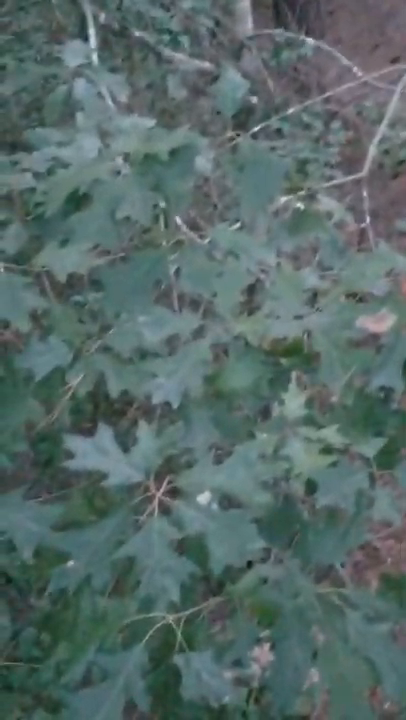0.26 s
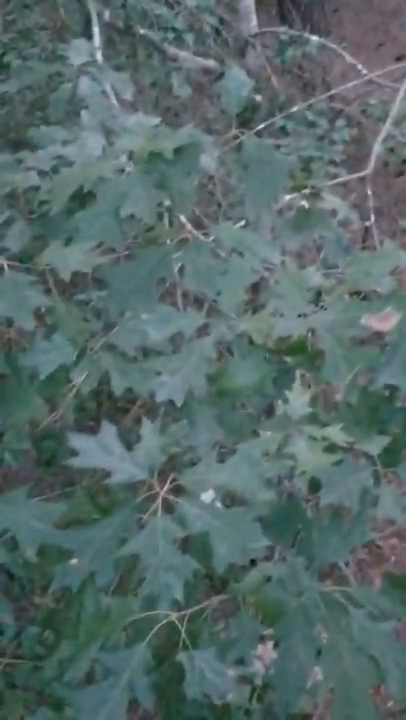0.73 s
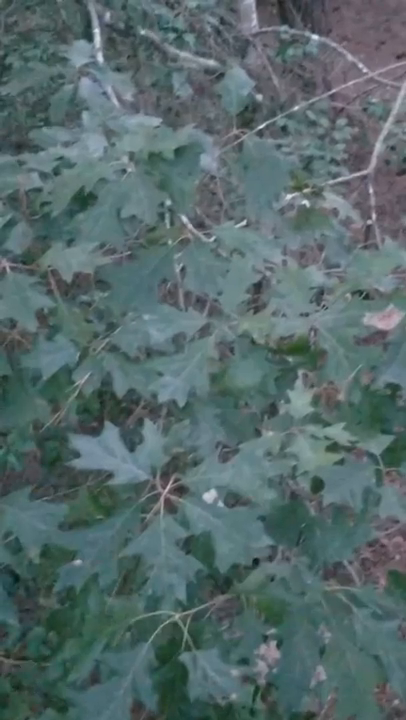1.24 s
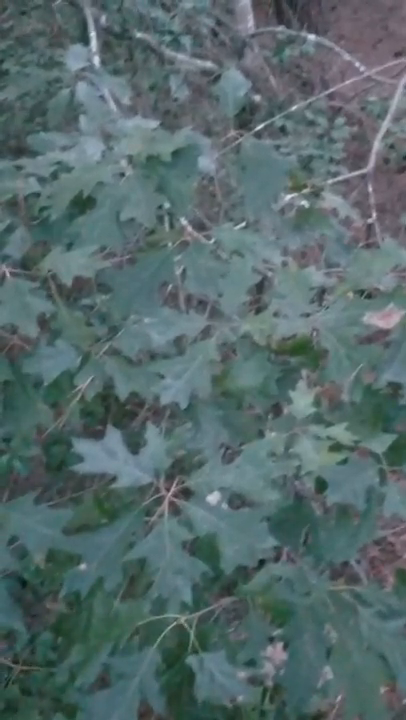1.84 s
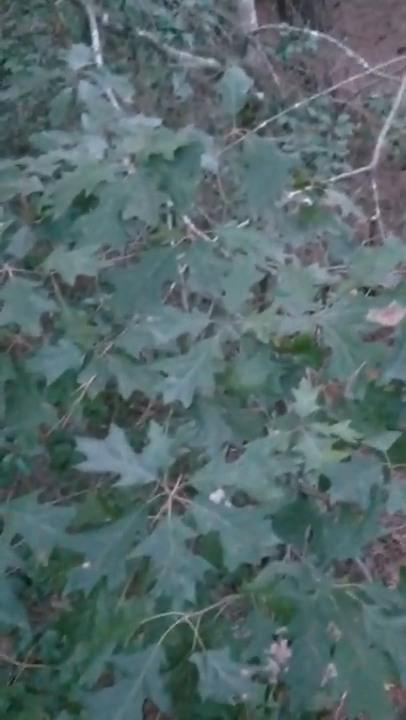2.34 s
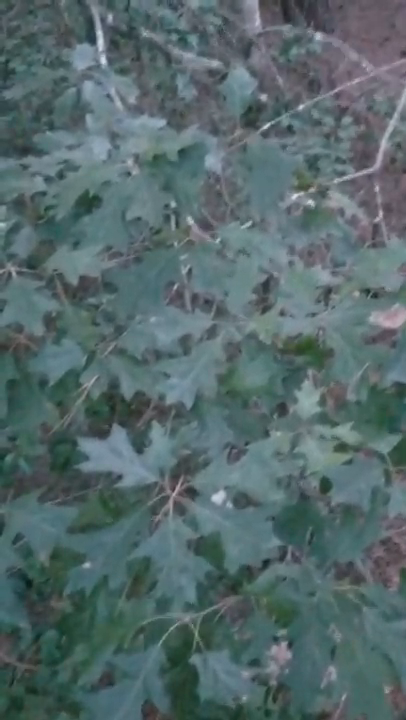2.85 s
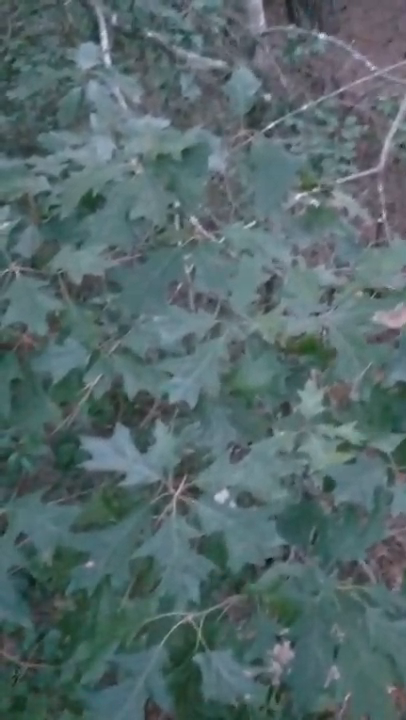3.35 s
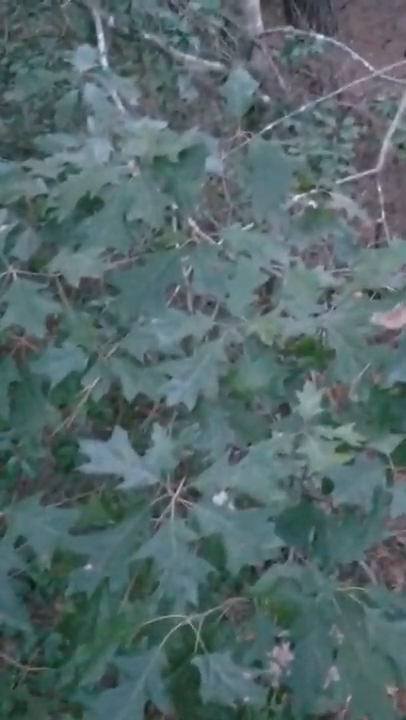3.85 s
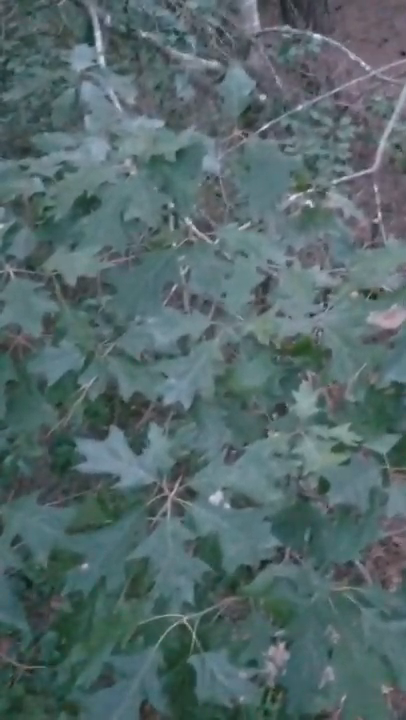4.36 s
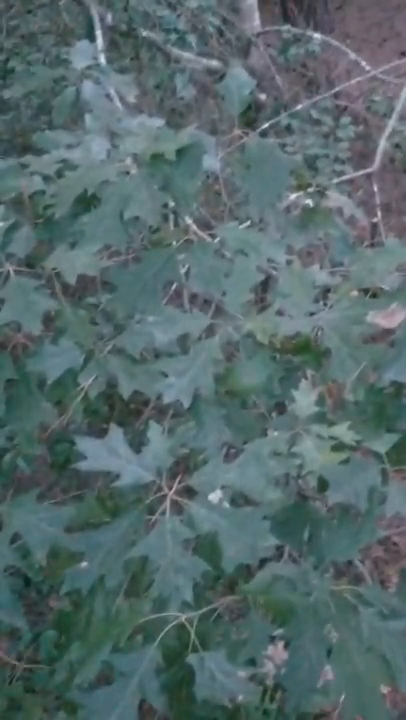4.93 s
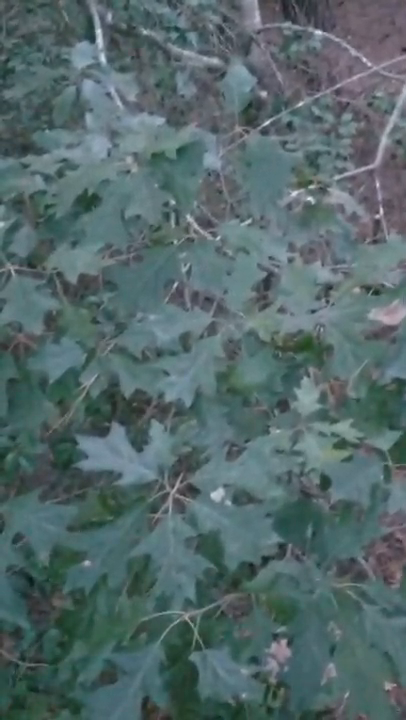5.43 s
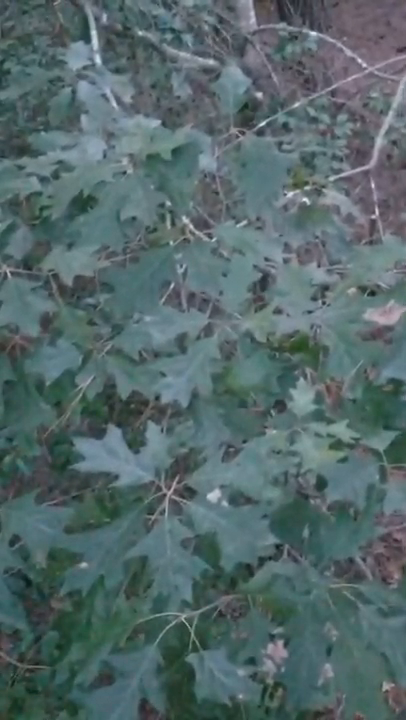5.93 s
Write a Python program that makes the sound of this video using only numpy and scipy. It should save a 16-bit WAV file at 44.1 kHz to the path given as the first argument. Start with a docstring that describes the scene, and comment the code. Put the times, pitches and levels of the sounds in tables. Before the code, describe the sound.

A calm wood, heard in stereo close to the shooter. From 0 to 4.9 seconds, three crickets chirp in overlapping short pulses around 4.5 to 5 kHz, over a finely beating insect trill near 8 kHz, hissing distant insects and soft leafy air. A low engine hum, far off, is louder at first and recedes. A small bird gives abrupt rising chips at 0.3, 2.6, 3.2 and 4.3, the second and fourth clearest. Small dry clicks come at 2.3 and 3.6, with faint hand rumble; a thin whistle rises at 4.5. At 4.9 a crossbow fires: bright latch snap, then within ten milliseconds a huge, short, woody slam with crack and faint trunk echoes. At 5.14 the bolt knocks sharply, rebounding at once. Until about 6.2 the ambience is ducked and faint, with brief sleeve scuffs and clicks at 5.3, 5.6, 5.8 and 6.05.

```python
"""In a wood, crickets chirp, a meadow insect trills, a small bird chips and a far engine hums; a crossbow is fired.
The latch snap, the string slam and the bolt's knock a quarter second later are noise bursts and struck resonances.
Animal and engine notes are sines of varying pitch; the insect chorus, trill rasp, air, cloth and hand are shaped noise.
Ticks are brief band-passed bursts, and trunks and leaves add scatter and echoes.
The shot drives the recorder's gain down, so the wood and the rustle of handling are faint afterwards."""
import sys
import numpy as np
from scipy import signal
from scipy.fft import rfft, irfft
from scipy.io import wavfile
from scipy.ndimage import uniform_filter1d

SR = 44100
rng = np.random.default_rng(int(sys.argv[2]) if len(sys.argv) > 2 else 0)


def generate_wav(sig):
    """Save sig (samples, or channels by samples) to the path in sys.argv[1] as 16-bit PCM at SR."""
    pcm = np.round(np.clip(np.atleast_2d(sig).T, -1, 1) * 32767).astype(np.int16)
    wavfile.write(sys.argv[1], SR, pcm)


N = 272964
TIME = np.arange(N) / SR   # seconds
BINS_HZ = np.maximum(np.arange(N // 2 + 1) * SR / N, 1)

# All noise spectra are relative, and every balance is left over right.
# Blows inside the bow. Each row: start in seconds, relative level in dB, rise in seconds,
# 60 dB decay time in seconds, share of bright crack from 0 to 1.
BLOWS = [(4.8988, -2, .001, 0.036, 0.88), (4.901, -1.5, .0008, 0.028, 1), (4.905, -2.5, .003, 0.053, .3),
         (4.9091, 10.5, .002, .07, .15), (4.9106, 9.5, .001, 0.082, .4), (4.9552, -0.5, .0005, .01, 1),
         (4.965, -19.5, 0.0036, 0.14, 0.7)]
# Spectrum of latch and string. Each row: frequency in Hz, density in dB per Hz.
CRACK_SPECTRUM = [(180, -50.5), (300, -20), (737, -29), (1060, -0.5), (1840, -5.5), (2570, 1.5),
                  (3400, -19), (3830, -6.5), (7570, -11.5), (9550, -20.5), (10200, -15), (13100, -11),
                  (16000, -15)]
# Spectrum of limbs and stock. Each row: frequency in Hz, density in dB per Hz.
SLAM_SPECTRUM = [(24, -33), (40, -8), (99, -1.5), (171, -5.5), (615, -5), (1150, -1), (1440, -14),
                 (1810, 0), (2260, -9.5), (2840, 1.5), (3140, -11.5), (5050, -8), (8340, -32), (14100, -17),
                 (16000, -15)]
# Resonances of limbs, stock and string. Each row: frequency in Hz, relative level in dB, 60 dB decay time in seconds.
BOW_MODES = [(66, -28, 0.15), (96, -35, 0.52), (279, -16.5, 0.12), (313, -17, 0.098), (548, -12.5, 0.059),
             (639, -6, .06), (877, -6, 0.079), (1081, -12.5, 0.12), (1222, -11.5, .1), (1478, -23.5, .22),
             (1620, -19, 0.12), (1786, -15.5, .11), (1880, -19.5, 0.17), (2280, -14.5, 0.071),
             (2516, -15, 0.089), (2590, -8.5, 0.065), (2730, -15, 0.057), (4400, -16.5, 0.098),
             (4980, -14.5, .1), (5500, -20.5, 0.086)]
# Stereo balance of the bow. Each row: frequency in Hz, balance in dB.
BOW_PAN = [(60, 2.5), (400, 2), (1300, 2), (2400, -5), (4400, -0.5), (8000, 5.5), (11000, 6.5),
           (14000, 12.5)]
# Echoes of the shot from near trunks. Each row: delay in seconds, level in dB.
TRUNK_ECHOES = [(.041, -29), (.052, -25.5), (.066, -36)]
# The bolt strikes and rebounds. Each row: time in seconds, relative level in dB.
BOLT_HITS = [(5.1420, -14), (5.1438, -18), (5.1452, -6.5), (5.1503, -5)]
# Resonances of the bolt's knock. Each row: frequency in Hz, relative level in dB, 60 dB decay time in seconds.
BOLT_MODES = [(338, -25.5, 0.051), (740, -25, 0.0072), (1290, -22.5, 0.0078), (2130, -8.5, 0.0081),
              (2370, -8, .012), (2690, -38, 0.0087), (4760, -16, 0.0089)]
# Clear clicks of gear and twigs. Each row: start in seconds, level in dB, centre in Hz,
# ratio of band edge to centre (1.2 at least is used), 60 dB decay time in seconds, balance in dB.
TICKS = [(1.758, -49, 6000, 2, 0.0058, -5), (2.292, -42.5, 12000, 3.2, .0066, -7),
         (2.335, -33.5, 6000, 2.8, 0.0019, -9), (3.252, -48, 8000, 2.2, 0.016, -9),
         (3.441, -48, 1850, 1.13, .019, -6), (3.6431, -30, 4500, 2.4, 0.0014, -20),
         (5.3191, -26, 3200, 2.8, .014, 3), (5.591, -32.5, 5950, 1.57, 0.0046, -17),
         (5.799, -17, 2620, 2, 0.0037, 17), (5.8037, -19.5, 1960, 3, .0041, -5),
         (6.029, -37, 790, 1.9, .027, -9), (6.075, -30, 2010, 1.9, 0.013, 2)]
# Strokes of the sleeve over the stock. Each row: peak time in seconds, length in seconds, level in dB.
SLEEVE_STROKES = [(5.083, 0.027, -31), (5.105, 0.023, -34), (5.345, 0.13, -42.5), (5.514, 0.046, -37),
                  (5.78, .13, -46.5), (5.996, .042, -33), (6.059, .058, -40), (6.124, 0.052, -39.5),
                  (6.178, 0.038, -38.5)]
# Spectrum of cloth. Each row: frequency in Hz, density in dB per Hz.
CLOTH_SPECTRUM = [(25, -21), (60, -1), (130, -7), (300, -11.5), (600, -9), (1000, -15.5), (2500, -14),
                  (3600, -26.5), (5300, -16.5), (7700, -40.5), (12500, -27), (16000, -31)]
# Stereo balance of cloth. Each row: frequency in Hz, balance in dB.
CLOTH_PAN = [(100, -7.5), (1000, -11), (3000, -23), (12000, -5)]
# The hand shifts its grip on the recorder. Each row: peak time in seconds, level in dB.
NUDGES = [(2.5, -62.5), (3.03, -62), (3.33, -58.5), (3.67, -55), (4.04, -57.5)]
# Spectrum of the hand's rumble. Each row: frequency in Hz, density in dB per Hz.
HAND_SPECTRUM = [(20, -15), (45, -1.5), (65, 3), (100, -11.5), (160, -23.5), (400, -59)]
# Stereo balance of the hand's rumble. Each row: frequency in Hz, balance in dB.
HAND_PAN = [(30, 2), (200, 2.4)]
# Cricket voices by name. Each row: pitch in Hz, sag in a stroke in Hz, stroke period in seconds,
# stroke length in seconds, strokes a chirp (rounded to a whole number), balance in dB.
CRICKETS = {"high": (4999.5, 379.5, .046, .032, 3, -6.5), "middle": (4799.5, 120, .046, .026, 4, -10),
            "low": (4600, 400, .038, .042, 3.5, -5)}
# Each cricket's chirps by name. Each row: start in seconds, level in dB.
CHIRPS = {"high": [(.055, -52), (.92, -52), (1.925, -54), (2.59, -51.5), (3.855, -53), (4.72, -57)],
          "middle": [(.255, -55), (.645, -53.5), (1.015, -53), (1.36, -60), (1.53, -53.5), (1.93, -50.5),
          (2.367, -52.5), (2.835, -54), (3.35, -53), (3.87, -55.5), (4.31, -54.5), (4.73, -51.5)],
          "low": [(.162, -56.5), (.6, -57.5), (1.168, -58), (1.61, -55), (2.035, -57.5), (2.385, -58.5),
          (2.757, -56.5), (3.3, -57), (3.71, -57), (4.135, -56.5), (4.688, -56.5)]}
# Chips of the bird. Each row: start in seconds, start pitch in Hz, end pitch in Hz, level in dB.
CHIPS = [(0.257, 5500, 7860, -39.5), (2.615, 5900, 7800, -31.5), (3.217, 5200, 7700, -44.5),
         (4.327, 5800, 8300, -29.5)]
# Spectrum of the trill's rasp. Each row: frequency in Hz, density in dB per Hz.
TRILL_SPECTRUM = [(5500, -48.5), (6900, -21.5), (7500, -2), (7820, -0.5), (7900, 1), (7980, -1.5),
                  (8150, -5), (8350, -49.5), (13500, -39.5), (14800, -19.5), (15700, -14), (16300, -25.5)]
# Stereo balance of the rasp. Each row: frequency in Hz, balance in dB.
TRILL_PAN = [(7000, 21), (16000, 9)]
# Slow course of the trill. Each row: time in seconds, relative level in dB.
TRILL_LEVEL = [(0, 0.64), (2.4, 1), (3.1, -1.4), (4.9, -1.5)]
# Spectrum of far rumble and leaves. Each row: frequency in Hz, density in dB per Hz.
AIR_SPECTRUM = [(15, -40.5), (25, -17), (55, -9.5), (152, -7.5), (188, -7.5), (218, -13), (379, -8),
                (592, -7.5), (732, -2.5), (1030, -9), (1670, -8), (2250, -19.5), (2790, -11.5),
                (3450, -32.5), (4000, -30), (5200, -49), (8800, -120)]
# Stereo balance of the wood. Each row: frequency in Hz, balance in dB.
WOOD_PAN = [(60, -6), (92, 1), (140, -4.5), (210, 1.0), (330, 0), (500, -4), (770, -3.0), (1170, -5),
            (1790, 5), (2740, -12.5), (4190, 5.5), (6410, 6.5), (9810, 6.0), (15000, 4.0)]
# Course of the far engine's roar. Each row: time in seconds, relative level in dB.
ROAR_LEVEL = [(0.1, -63), (1.35, -70), (1.68, -61), (1.87, -69), (4.63, -67), (4.7, -68)]
# Spectrum of the roar. Each row: frequency in Hz, density in dB per Hz.
ROAR_SPECTRUM = [(120, -30.5), (200, -6.5), (290, 2.5), (420, -1), (700, -37.0)]
# Stereo balance of the roar. Each row: frequency in Hz, balance in dB.
ROAR_PAN = [(200, 0.82), (400, 2)]
# Spectrum of the far insects. Each row: frequency in Hz, density in dB per Hz.
CHORUS_SPECTRUM = [(3500, -32), (4050, -18.5), (4300, -3.5), (4750, 6), (5200, 0), (6000, 3.5),
                   (6700, -10.5), (8000, 9), (8600, -30.5), (9700, -33.5), (10500, -12), (12600, -10),
                   (14000, -7), (16000, -3)]
# Stereo balance of the far insects. Each row: frequency in Hz, balance in dB.
CHORUS_PAN = [(4000, -2), (5400, -9), (6600, 2.5), (8000, -8), (9000, -9), (12600, -4), (14000, 5.5)]
# Coherence of the two ports. Each row: frequency in Hz, likeness from 0 to 1.
LIKENESS = [(60, 0.71), (200, 0.97), (500, 1), (1200, .25), (3000, 0.41), (8000, 0.1), (15000, .2)]

PORT_LAG_S, CUTOFF_HZ = .00032, 15900
# fainter ticks come at random
FAINT_TICKS_PER_S, FAINT_TICK_DB, FAINT_TICK_HZ, FAINT_TICK_T60_S, FAINT_TICK_PAN_DB = .7, -61, 9000, .009, -4
# part of a stroke spent swelling; its two ends lie this far under the peak
STROKE_SWELL_SHARE, STROKE_EDGE_DB = 0.57, 11
NUDGE_S, GRIP_DB, GRIP_WANDER_DB = 0.25, -68, 0.5   # length of a shift; rumble of the hand at rest
CHIP_FADE_DB = 5   # each chip fades as it climbs
# the far engine's note: settled level, how much louder it starts, time constant of receding
ENGINE_DB, ENGINE_EARLY_DB, ENGINE_RECEDE_S = -70, 8, 1.1


def crossbow(ring_db, crack_db, slam_db):
    """Impact excitation: each blow is a burst of dense noise, and the heaviest sets limbs and stock ringing."""
    crack_power, slam_power, strikes = 0, 0, []
    for s, db, rise, t60, bright in BLOWS:
        power = (from_db(db) * burst(s, rise, t60)) ** 2
        bright = np.clip(bright, 0, .99)
        crack_power = crack_power + bright * power
        slam_power = slam_power + (1 - bright) * power
        strikes.append((s + rise, db + 10 * np.log10(1 - bright)))
    out = from_db(crack_db) * np.sqrt(crack_power) * noise(CRACK_SPECTRUM, BOW_PAN)
    out += from_db(slam_db) * np.sqrt(slam_power) * noise(SLAM_SPECTRUM, BOW_PAN)
    heaviest_s, heaviest_db = max(strikes, key=lambda strike: strike[1])
    for hz, db, t60 in BOW_MODES:
        # the shock reaches each part of the bow at a slightly different moment
        arrival_s = heaviest_s + rng.uniform(-0.0033, 0.0011)
        force = clicks([(arrival_s, heaviest_db + db + ring_db)]) * rng.choice([-1, 1])
        out += ports(ring(force, hz, t60), at_hz(BOW_PAN, hz), lag_s=rng.uniform(0, PORT_LAG_S))
    echo_band = signal.butter(1, [900, 4000], "band", fs=SR, output="sos")
    reflected = signal.sosfilt(echo_band, out)
    echoes = sum(from_db(db) * np.array([late(side, delay) for side in reflected])
                 for delay, db in TRUNK_ECHOES)
    return out + echoes


def bolt(splinter_db, pan_db):
    """Modal response to impact: repeated hits excite damped woody modes, with a little splintering noise."""
    force = clicks(BOLT_HITS)
    knock = sum(from_db(db) * ring(force, hz, t60) for hz, db, t60 in BOLT_MODES)
    splinter_envelope = burst(BOLT_HITS[0][0], 0.00032, 0.35)
    splinter = from_db(splinter_db) * splinter_envelope * noise(CRACK_SPECTRUM, BOW_PAN)
    return ports(knock, pan_db) + splinter


def ticks(lag_s):
    """Transient in a heavily damped resonance: each click is a very short burst of band-passed noise."""
    out = np.zeros((2, N))
    faint = [(s, FAINT_TICK_DB, FAINT_TICK_HZ, 2, FAINT_TICK_T60_S, FAINT_TICK_PAN_DB)
             for s in TIME[rng.random(N) < FAINT_TICKS_PER_S / SR]]
    white = rng.standard_normal(N)
    for s, db, hz, width, t60, pan_db in TICKS + faint:
        width = max(width, 1.2)
        band = signal.butter(2, [hz / width, min(hz * width, .45 * SR)], "band", fs=SR, output="sos")
        grain = rms_one(signal.sosfilt(band, white))
        out += ports(from_db(db) * grain * burst(s, .0001, t60), pan_db, lag_s)
    return out


def sleeve(grain_db, drag_db):
    """Stick-slip friction: cloth catches and slips as the bow is lowered, and drags lightly between strokes."""
    strokes = sum(from_db(db) * swell(s, length, STROKE_SWELL_SHARE, STROKE_EDGE_DB)
                  for s, length, db in SLEEVE_STROKES)
    drag = from_db(drag_db) * (TIME > SLEEVE_STROKES[0][0])
    return np.hypot(strokes, drag) * flutter(220, grain_db) * noise(CLOTH_SPECTRUM, CLOTH_PAN)


def hand():
    """Contact noise: the grip on the recorder gives a low rumble, with a soft bump at each shift."""
    nudges = sum(from_db(db) * swell(s, NUDGE_S, rise_share=0.48, edge_db=15) for s, db in NUDGES)
    resting = from_db(GRIP_DB) * flutter(4.5, GRIP_WANDER_DB)
    return np.hypot(nudges, resting) * noise(HAND_SPECTRUM, HAND_PAN)


def cricket(chirps, top_hz, fall_hz, period, stroke_s, strokes, pan_db):
    """Stridulation: file draws over scraper, a note that sags as the wing slows, uneven from tooth to tooth."""
    out = np.zeros(N)
    along = np.linspace(0, 1, int(stroke_s * SR))
    teeth = flutter(700, 0.18)
    for s, db in chirps:
        for k in range(round(strokes)):
            at = int((s + k * period) * SR)
            span = slice(at, at + len(along))
            hz = (top_hz - fall_hz * along ** 2.6) * (1 + rng.normal(0, 0.004)) * teeth[span]
            out[span] += from_db(db) * np.sin(np.pi * along) * tone(hz)
    return ports(out, pan_db, lag_s=0.00027)


def bird(length_s, octave_db, pan_db):
    """Frequency modulation: a chip is one abrupt upward whistle with its octave, its pitch roughened at random."""
    out = np.zeros(N)
    along = np.linspace(0, 1, int(length_s * SR))
    abrupt = np.abs(np.sin(np.pi * along)) ** .4   # starts and stops almost at once
    envelope = abrupt * from_db(-CHIP_FADE_DB * along)
    climb = np.tanh(2 * along) / np.tanh(2)
    rasp = flutter(2200, .3)
    for s, start_hz, end_hz, db in CHIPS:
        span = slice(int(s * SR), int(s * SR) + len(along))
        hz = (start_hz + (end_hz - start_hz) * climb) * rasp[span]
        out[span] += from_db(db) * envelope * (tone(hz) + from_db(octave_db) * tone(2 * hz))
    return ports(out, pan_db, lag_s=.00004)


def far_whistle(start_s, length_s, start_hz, rise_hz, db, waver):
    """Frequency glide: a thin wavering note from deep in the wood rises and levels off."""
    along = np.clip((TIME - start_s) / length_s, 0, 1)
    hz = (start_hz + rise_hz * np.sin(np.pi / 2 * along)) * flutter(520, waver)
    envelope = from_db(db) * np.sqrt(along * (1 - along))   # peaks at half the gain
    return ports(envelope * tone(hz), -5.0, lag_s=.00018)


def trill(db, depth, closing_db, note_hz, note_db, snap_db):
    """Amplitude modulation: opening and closing wings beat a rasp and a note; each closing brightens it."""
    beats_per_s = 25.7
    phase = 2 * np.pi * np.cumsum(beats_per_s * flutter(1.5, .1)) / SR
    beat = (1 + depth * np.cos(2 * phase)) * from_db(closing_db * np.cos(phase))
    closing = from_db(snap_db * np.cos(phase / 2) ** 24)   # a narrow peak once a beat
    note = from_db(note_db) * flutter(25, 3) * tone(note_hz * flutter(90, .018))
    rasp = noise(TRILL_SPECTRUM, TRILL_PAN)
    overtone = irfft(rfft(rasp) * (BINS_HZ > 11000), N)
    body = rasp - overtone + ports(note, 14)
    wings = rms_one(beat) * body + rms_one(closing) * overtone
    return from_db(db) * level(TRILL_LEVEL) * wings


def engine(roar_db, hum_hz):
    """Tone and noise: a far engine's wavering note starts louder and recedes, with a rough roar just above it."""
    hum_level = from_db(ENGINE_DB + ENGINE_EARLY_DB * np.exp(-TIME / ENGINE_RECEDE_S))
    hum = hum_level * flutter(9.4, 2) * tone(hum_hz * flutter(9.2, 0.09))
    roar = from_db(roar_db) * level(ROAR_LEVEL) * noise(ROAR_SPECTRUM, ROAR_PAN)
    return ports(hum, 1.5) + roar


def insect_chorus(db):
    """Superposition: many far insects merge into banded noise of unsteady level."""
    return from_db(db) * flutter(7, .6) * noise(CHORUS_SPECTRUM, CHORUS_PAN)


def air(db):
    """Broadband ambience: far rumble and leaves are a nearly steady noise."""
    return from_db(db) * flutter(3, 0.3) * noise(AIR_SPECTRUM, WOOD_PAN)


def woods(x, wet_db, t60, dull_hz):
    """Diffuse scattering: trunks and leaves add a grainy, decaying and dulled tail."""
    age = TIME[:SR]
    scatter = rng.standard_normal((2, SR)) * rng.exponential(1, (2, SR))
    scatter *= np.minimum(age / 0.0068, 1) * np.exp(-np.log(1000) * age / t60)
    scatter /= np.sqrt(np.sum(scatter ** 2, axis=1)[:, None])
    scatter = signal.sosfilt(signal.butter(1, dull_hz, fs=SR, output="sos"), scatter)
    return x + from_db(wet_db) * signal.fftconvolve(x, scatter, axes=1)[:, :N]


def from_db(db):
    """Logarithmic level: decibels to amplitude gain."""
    return 10 ** (np.asarray(db) / 20)


def rms_one(x):
    """Normalization: scale to unit mean power."""
    return x / np.sqrt(np.mean(x ** 2) + 1e-20)


def level(rows):
    """Level envelope: decibels interpolated in time, then turned to gain."""
    return from_db(np.interp(TIME, *np.transpose(rows)))


def at_hz(points, hz):
    """Interpolation on a logarithmic frequency axis."""
    freqs, values = np.transpose(points)
    return np.interp(np.log(hz), np.log(freqs), values)


def pan(db):
    """Level difference between ears: left and right gains of constant power."""
    gains = from_db(np.array([[.5], [-.5]]) * db)
    return gains / np.sqrt(np.mean(gains ** 2, axis=0))


def late(x, seconds):
    """Propagation delay."""
    return np.interp(TIME - seconds, TIME, x, left=0)


def ports(x, pan_db, lag_s=PORT_LAG_S):
    """Arrival-time difference: a point source reaches the right port after the left by a given lag."""
    return np.array([x, late(x, lag_s)]) * pan(pan_db)


def noise(spectrum, balance):
    """Partial coherence: coloured stereo noise of rms 1, alike in the bass and diffuse in the treble."""
    left, other = rfft(rng.standard_normal((2, N)))
    alike = np.clip(at_hz(LIKENESS, BINS_HZ), 0, 1)
    right = alike * left + np.sqrt(1 - alike ** 2) * other
    right = right * np.exp(-2j * np.pi * BINS_HZ * PORT_LAG_S)
    colour = from_db(at_hz(spectrum, BINS_HZ)) * pan(at_hz(balance, BINS_HZ))
    return rms_one(irfft(np.array([left, right]) * colour, N))


def flutter(rate, depth_db):
    """Random modulation: a gain that wanders between knots at a rate in Hz."""
    knots = np.arange(0, N / SR + 1, 1 / rate)
    return from_db(depth_db * np.interp(TIME, knots, rng.standard_normal(N)[:len(knots)]))


def tone(hz):
    """Phase accumulation: a sine that follows a varying frequency."""
    return np.sin(2 * np.pi * np.cumsum(hz) / SR)


def burst(start, rise, t60):
    """Exponential decay: an envelope that climbs to 1 and dies away."""
    age = TIME - start
    return np.clip(age / rise, 0, 1) * np.exp(-np.log(1000) * np.clip((age - rise) / t60, 0, 4))


def swell(peak_s, length_s, rise_share, edge_db):
    """Gaussian envelope: a movement gathers speed, peaks at 1 and stops."""
    share = np.where(TIME < peak_s, rise_share, 1 - rise_share)
    away = (TIME - peak_s) / (length_s * share)
    return from_db(-np.minimum(edge_db * away ** 2, 200))


def ring(force, hz, t60):
    """Damped resonator: a unit click sets a decaying sine of initial height 1 ringing."""
    r, w = np.exp(-np.log(1000) / (t60 * SR)), 2 * np.pi * hz / SR
    return signal.lfilter([0, np.sin(w)], [1, -2 * r * np.cos(w), r * r], force + 1e-18)


def clicks(rows):
    """Impulse train: one click for each row of seconds and dB."""
    out = np.zeros(N)
    for s, db in rows:
        out[round(s * SR)] += from_db(db)
    return out


def scene():
    """Superposition of the shot, the handling, the animals and the wood."""
    bow = crossbow(ring_db=-1.5, crack_db=-3.0, slam_db=-1.5)
    shot = woods(bow, wet_db=-28.5, t60=0.78, dull_hz=11000)
    knock = bolt(splinter_db=-31.5, pan_db=-11)
    hit = woods(knock, wet_db=-7, t60=.33, dull_hz=12000)
    handling = woods(ticks(lag_s=.00006), wet_db=-21, t60=0.44, dull_hz=6000)
    handling += sleeve(grain_db=2.4, drag_db=-55) + hand()
    crickets = sum(cricket(CHIRPS[name], *voice) for name, voice in CRICKETS.items())
    whistle = far_whistle(start_s=4.455, length_s=.21, start_hz=5400, rise_hz=180, db=-58.5, waver=.26)
    animals = woods(crickets + whistle, wet_db=-3, t60=.35, dull_hz=12000)
    chips = bird(length_s=0.018, octave_db=-4, pan_db=3.5)
    animals += woods(chips, wet_db=-5, t60=.36, dull_hz=14000)
    animals += trill(db=-61.5, depth=.22, closing_db=1.0, note_hz=7890, note_db=-9, snap_db=7)
    wood = engine(roar_db=-2.5, hum_hz=187.7) + insect_chorus(db=-62.5) + air(db=-57)
    return shot + hit + handling + animals + wood


def gain_control(x, limit_db, ahead_s):
    """Peak-hold compression: the gain dives just ahead of a loud sound and stays down."""
    power = uniform_filter1d(np.mean(x ** 2, axis=0), int(0.008 * SR))
    excess_db = np.maximum(10 * np.log10(np.maximum(power, 1e-12)) - limit_db, 0)
    held_db = np.maximum.accumulate(excess_db)
    early_db = np.interp(TIME + ahead_s, TIME, held_db)
    return x * from_db(-uniform_filter1d(early_db, int(.003 * SR)))


def record(dry):
    """Recording chain: bass cut, gain control, rounded peaks and a steep top cut."""
    mic = signal.sosfilt(signal.butter(2, 30, "high", fs=SR, output="sos"), dry)
    rounded = np.tanh(gain_control(mic, limit_db=-10.0, ahead_s=.007))
    return signal.sosfilt(signal.ellip(12, .2, 90, CUTOFF_HZ, fs=SR, output="sos"), rounded)


dry = scene()
out = record(dry)
generate_wav(out)
```